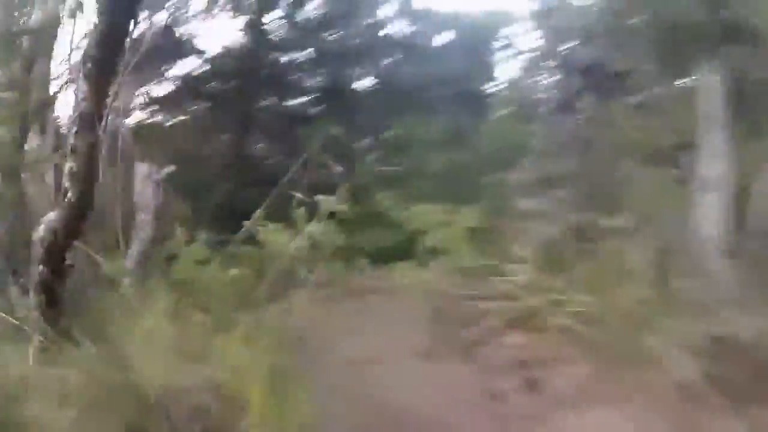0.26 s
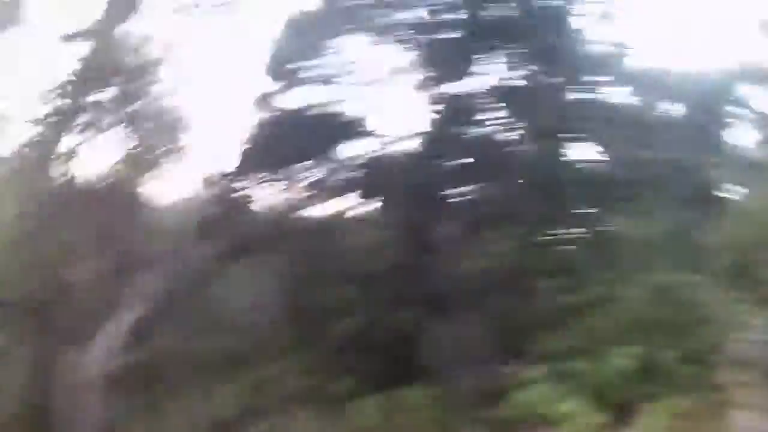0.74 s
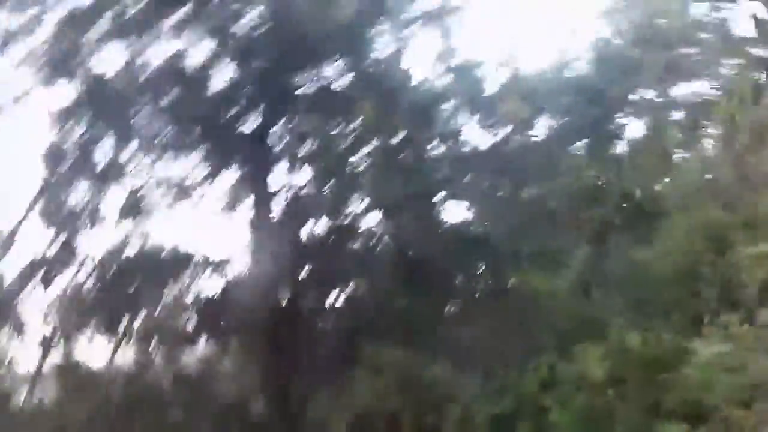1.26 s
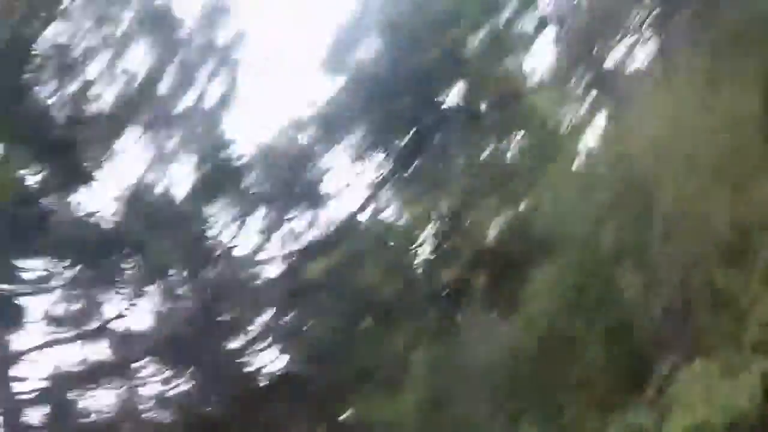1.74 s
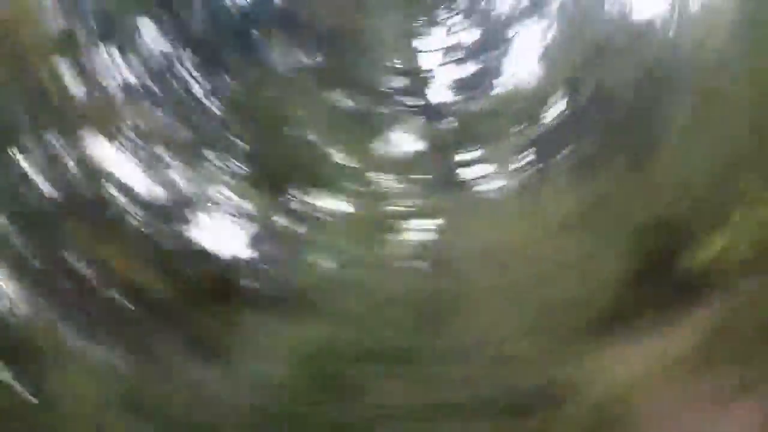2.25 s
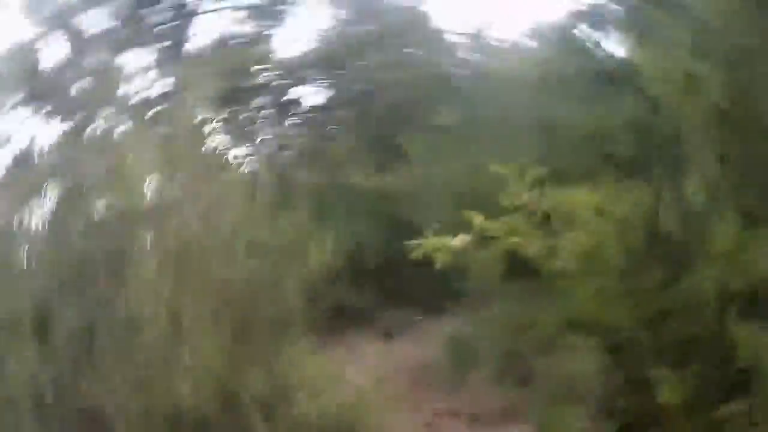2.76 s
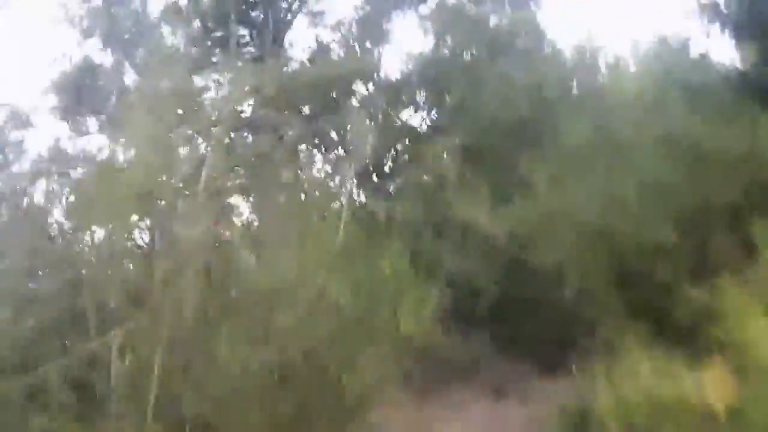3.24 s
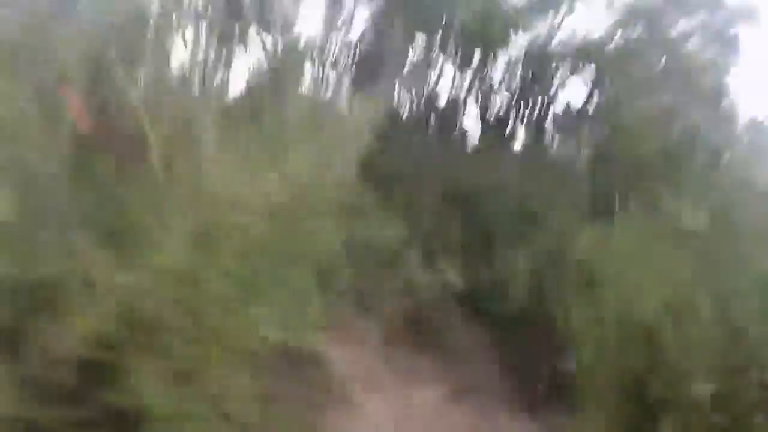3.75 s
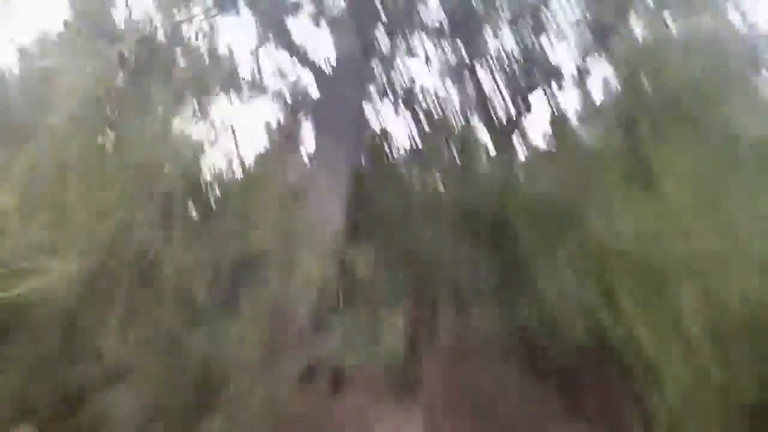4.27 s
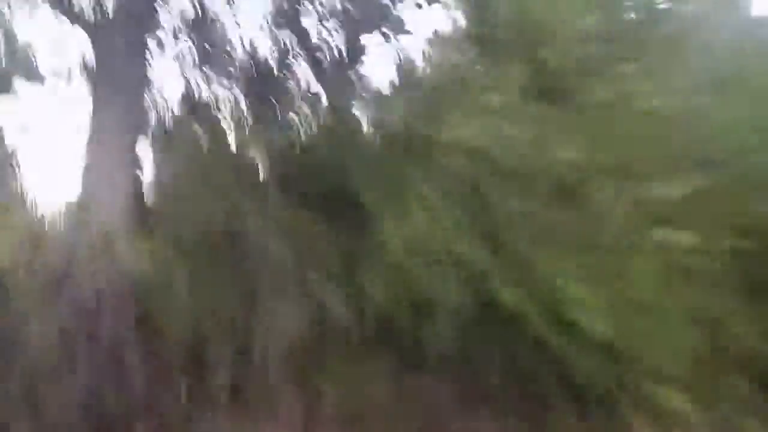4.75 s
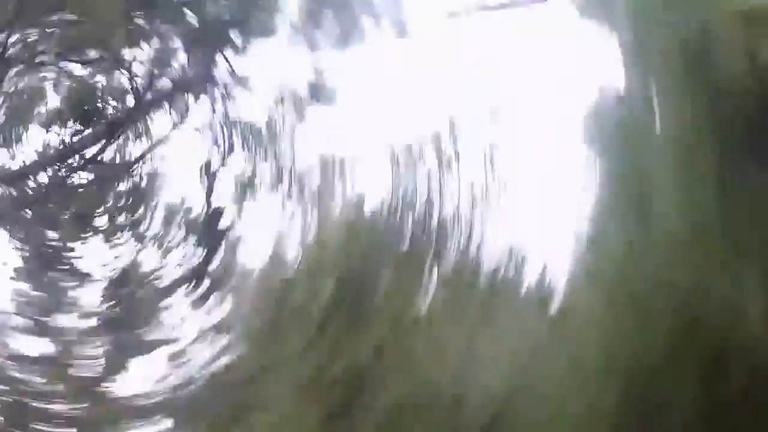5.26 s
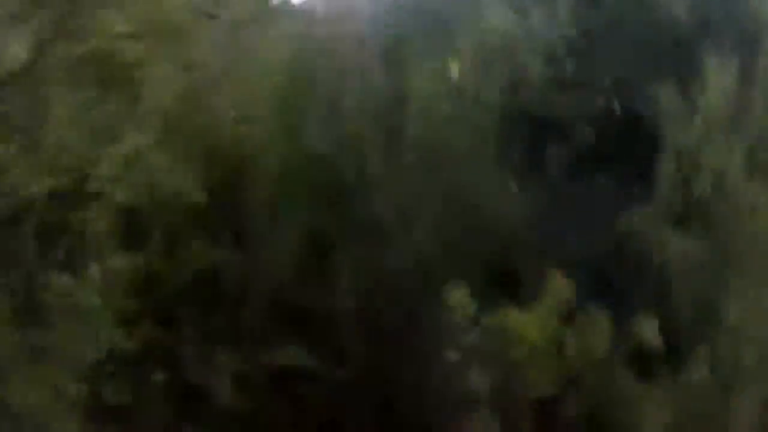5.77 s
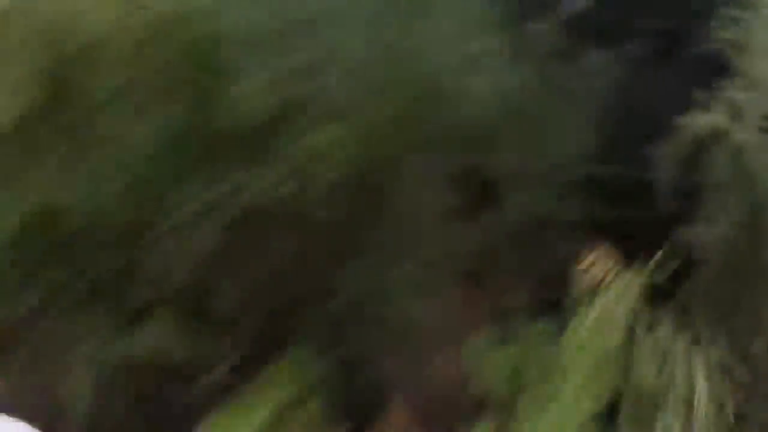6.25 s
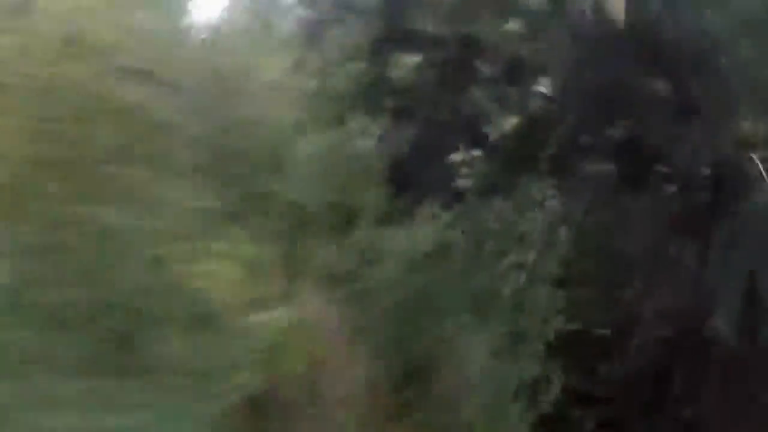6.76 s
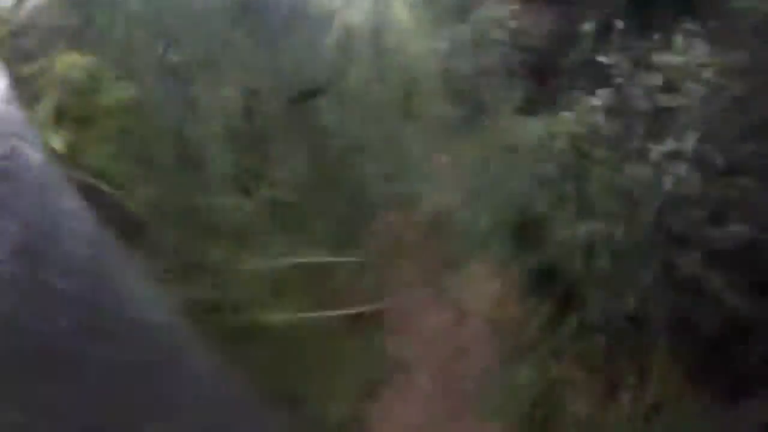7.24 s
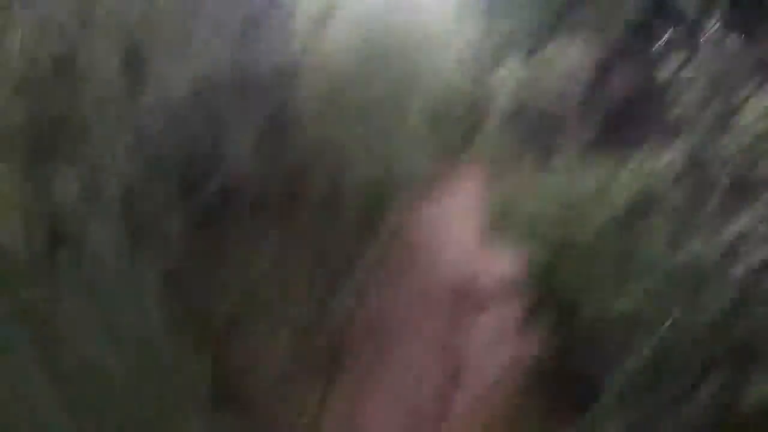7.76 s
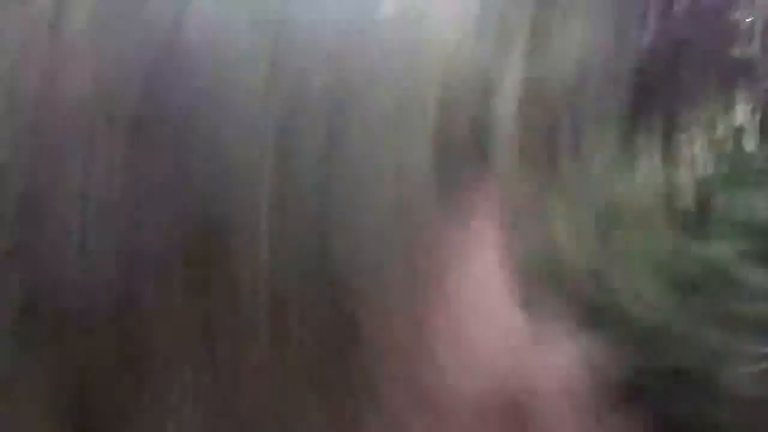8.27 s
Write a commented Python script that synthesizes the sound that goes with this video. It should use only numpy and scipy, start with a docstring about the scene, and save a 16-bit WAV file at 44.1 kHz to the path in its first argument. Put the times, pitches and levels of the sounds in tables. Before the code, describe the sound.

A runner hurries along a wooded dirt path, heard close from a small handheld camera in a plastic case. Shoes scrape, twigs crack and wind thumps unevenly on the microphone throughout. Fingers give the case one loud, hollow knock early, then a cluster of bumps and rubs later on. A twig snaps sharply just before the end. The treble has a slightly harsh, gritty edge.

```python
"""A runner hurries down a forest trail, holding a small camera in a plastic housing.
From the start air buffets the port, shoes scuff dirt and brush, twigs snap and grit ticks.
At 1.2 s the hardest knock of the fingers sets the housing's walls and enclosed air ringing.
Steps and wind carry on; knocks and rubs crowd in from 4.5 to 6.5 s, and a sharp snap comes at 8.1 s.
Throughout, the camera samples slowly and holds each sample, mirroring the sound into the treble."""
import sys
import numpy as np
from scipy import signal
from scipy.fft import rfft, irfft, next_fast_len
from scipy.io import wavfile
from scipy.ndimage import uniform_filter1d, map_coordinates

SR = 44100
rng = np.random.default_rng(int(sys.argv[2]) if len(sys.argv) > 2 else 0)


def output_pcm(signal):
    """Save a mono or channel-first signal as 16-bit PCM at the path in sys.argv[1].

    Samples are clipped to [-1, 1] before scaling.
    """
    pcm = np.clip(np.atleast_2d(signal).T, -1, 1) * 32767
    wavfile.write(sys.argv[1], SR, np.round(pcm).astype(np.int16))


N = 375291

# modes of the housing walls: pitch_hz, width_hz, gain_db
WALL_MODES = [(719, 106, 0), (914, 44, 0.5), (1134, 75, -4), (1832, 180, -4.5), (2317, 320, -1.5),
              (2413, 128, -6.5), (3000, 320, -25), (3457, 73, -6.5), (3643, 147, 3.5), (4874, 150, -16)]
# finger knocks: start_s, level_db, hollow_offset_db, walls_offset_db, hollow_pitch_hz, t60_s
KNOCKS = [(0.138, -40, 3, -16, 437, 0.028), (0.317, -44.5, 7, -26, 404, 0.036),
          (0.467, -40.5, 4.5, -18, 405, 0.027), (0.56, -47.5, 8, -13, 407, 0.089),
          (0.775, -33.5, 11, -6.5, 450, 0.043), (1.23, -11.5, -3, -12.5, 403.4, 0.065),
          (1.285, -26.5, 4, -16.5, 410, 0.058), (1.457, -43, 9.5, -3, 422, 0.056),
          (2.333, -49, -1, -16, 413, 0.031), (2.403, -44.5, 0.5, -9, 405, 0.071),
          (2.525, -59.5, 13, -24, 420, 0.035), (4.52, -34, 2.5, -27, 421, 0.036),
          (4.676, -22.5, -3, -16.5, 443, 0.029), (4.903, -35, -3.5, -23, 426, 0.029),
          (5.044, -42, 2, 1, 401, 0.15), (5.309, -23.5, -15.5, -14, 448, 0.023),
          (5.436, -39, 5, -21, 446, 0.031), (5.487, -57, 12, -33, 418, 0.042),
          (5.545, -35, 4, -27, 432, 0.028), (5.642, -44, 12, -21, 438, 0.14),
          (5.661, -24, 3.5, -11, 427.5, 0.053), (5.729, -28.5, 0, -2, 413, 0.054),
          (5.748, -40.5, 7.5, -15, 408, 0.026), (5.913, -27, -3, -25, 376, 0.022),
          (6.086, -32.5, -5, -9, 440, 0.033), (6.15, -28.5, -10, -8, 450, 0.046),
          (6.205, -39.5, 6, -12, 415, 0.065), (6.306, -31, -9, -17, 350, 0.028),
          (6.344, -31, -7, -26, 428, 0.043), (6.408, -22.5, -9.5, -7, 410, 0.066),
          (6.474, -40.5, 8.5, -4, 415, 0.056)]

def knocks():
    """Impulse response: a knock gives a dry tap and excites the walls and the air in the hollow."""
    hollow, taps, blows = np.zeros((3, N))
    t = np.arange(SR // 8) / SR
    swell = 1 - np.exp(-(t / 0.003) ** 2)
    for start, db, hollow_db, walls_db, hz, t60 in KNOCKS:
        ring = amp(db + hollow_db - 2 - 60 * (t / t60) ** 2.32)  # holds, then the grip damps it fast
        add(hollow, start, ring * swell * np.sin(2 * np.pi * hz * t))
        chatter = rng.standard_normal(len(t))
        chatter[0] = amp(15.5)  # the first contact stands out
        add(taps, start, amp(db + 5.5 - 60 * t / 0.014) * chatter)
        crack = amp(-60 * t / 0.0062)
        rattle = amp(-23.5 - 60 * (t / t60) ** 2)
        add(blows, start, amp(db + walls_db + 20) * (crack + rattle) * chatter)
    contact = modes([(974, 390, 0.4), (2037, 420, 1.4), (215, 275, 4.5)])
    return hollow + filtered(taps, contact) + filtered(blows, modes(WALL_MODES))

# strokes of the hand on the housing: start_s, length_s, level_db, swell_db, hollow_offset_db
RUBS = [(.14, 0.087, -61.5, -12, -2), (.25, .19, -70, 7, 10.5), (.455, 0.046, -57, 3, -1.5),
        (.56, 0.14, -65.5, -9, -2), (.7, 0.042, -66.5, 10, 10.5), (.88, 0.025, -64, 7, 2),
        (.98, 0.076, -58.5, 0, 6), (1.42, 0.049, -45, 4, -1.5), (1.485, .065, -48, -7, 0.5),
        (2.33, .1, -60, -5.5, 0.5), (5.04, 0.068, -48.5, -2, -3), (5.12, 0.059, -67, 1, 13),
        (5.44, 0.18, -62, 13, 0), (5.64, 0.099, -44, 0, 2), (5.915, 0.043, -49, -4.5, 3.5),
        (5.985, 0.067, -51.5, 2, -7), (6.088, 0.13, -46, 1, -3), (6.3, .04, -52.5, 0, 3.5),
        (6.345, 0.077, -37.5, 8.5, -2), (6.44, 0.084, -48, -9, 0), (6.51, 0.067, -51.5, 4, -5)]
RUB_EDGES = dict(rise_s=0.0022, fall_s=0.014, length_share=0.027)

def rubs(hollow_hz=416.8, hollow_width_hz=67):
    """Forced vibration: rough friction drives the wall modes and the cavity resonance."""
    walls = unit(filtered(gritty(70, spread_db=3), modes(WALL_MODES)))
    hollow = unit(filtered(gritty(40, spread_db=3), modes([(hollow_hz, hollow_width_hz, 0)])))
    wall_gain, hollow_gain = strokes(RUBS, **RUB_EDGES)
    return wall_gain * walls + hollow_gain * hollow

# spectra of a scuff and of its dull part: frequency_hz, density_db
DIRT_SPECTRUM = [(880, -38), (1500, -3.5), (1660, -4.5), (1810, 8.5), (1960, 4.5), (2390, 5.5),
                 (2740, -5.5), (3000, 1), (4200, -14), (5460, -50), (9240, -120)]
DULL_SPECTRUM = [(260, 8), (450, -9.5), (624, -6), (992, -4), (1210, 1), (1500, -4), (1950, -34),
                 (3300, -120)]
# brush and litter stirring between scuffs: time_s, level_db
BRUSH = [(0.0, -63.5), (0.33, -67), (0.8, -59), (1.04, -71), (1.26, -65), (1.4, -59), (1.56, -69.5),
         (2.72, -64.5), (2.94, -63.5), (5.57, -66.5), (6.35, -61), (6.71, -57), (7.42, -62), (8.51, -60)]
# drags of a shoe or leg: start_s, length_s, level_db, swell_db, dull_offset_db, hiss_offset_db
SCUFFS = [(.095, 0.14, -64.5, -8, -5, -18), (.45, 0.19, -59, 1.5, -4.5, -6.5),
          (.605, 0.02, -44.5, 2, -5.5, -29), (.662, 0.031, -52, -3, -8, -16),
          (.705, 0.023, -45.5, 3, -8, -36), (.765, 0.037, -54.5, -11, -4, -25),
          (.885, 0.07, -54.5, 11.5, -11, -15.5), (.97, 0.075, -61, -2, 0.5, -14),
          (1.31, 0.068, -64.5, 15, -17, -21), (1.425, 0.046, -55.5, 2, -1, -12),
          (1.485, 0.081, -60.5, -20, -4, -12), (1.76, 0.11, -69.5, -5, -14, -18),
          (2.17, 0.14, -66.5, -2, -11, -10), (2.32, 0.094, -64.5, 11, -8, -23),
          (2.61, 0.071, -65.5, -4, -12, -4), (2.82, 0.31, -58.5, 3.5, -9, -12),
          (3.2, 0.14, -63.5, 11, -13.5, -11), (3.42, 0.23, -63.5, 6, -3, -30),
          (3.72, 0.1, -60, 15, -2, -16), (3.91, 0.27, -60, 0, -11.5, -15), (4.2, 0.076, -63, 9, -3, -8),
          (4.3, 0.27, -68, -12, -4, -9.5), (4.52, 0.087, -59, -6, -5, -12), (4.75, 0.11, -60, 3, -5, -14),
          (4.95, 0.073, -67, -2, -1, -3), (5.035, 0.11, -62.5, -9, -1, -20),
          (5.16, 0.17, -60.5, 0, -3, -17), (5.44, 0.17, -62.5, 10, -1.5, -22),
          (5.635, 0.15, -52, -4, -6, -20), (5.78, .09, -60, 9, -1, -10), (5.912, 0.059, -59, -3, -3.5, -14),
          (5.985, 0.081, -58.5, 5, -1, -16), (6.085, 0.09, -55, 21, -15, -14),
          (6.3, 0.025, -53.5, 4, 3, -22), (6.34, 0.16, -45.5, -6.5, -2.5, -22),
          (6.53, 0.29, -61.5, -8, -1.5, -19), (6.94, 0.059, -61, -9, 1.5, -10),
          (7.01, 0.12, -58.5, -10, 1, -14), (7.2, 0.1, -71, -3, -1, -9), (7.5, 0.052, -66.5, 9, -1, -17),
          (7.6, 0.074, -62, 5, -10, -21), (7.925, 0.062, -50.5, 2, -5.5, -14),
          (8.1, 0.15, -60, -9, -6, -11), (8.27, .15, -61, -3, -8, -20), (8.46, .05, -76, -3, -16, -20)]

def ground_gains():
    """Incoherent sources add in power: drags plus brush, as gains of scrape, dull part and hiss."""
    brush = amp(curves(BRUSH)[0] + np.array([-5, -9.5, -13])[:, None])
    drags = strokes(SCUFFS, rise_s=0.0041, fall_s=0.0069, length_share=0.083)
    return np.hypot(drags, brush)

def scuffs(scrape_gain, dull_gain, hiss_gain):
    """Granular friction: dirt gives way in clumps that modulate three bands of noise together."""
    clumps = amp(1.07 * wobble(25))
    grains = patchy(gritty(200, spread_db=2.5), patch_db=1.4)
    scrape = unit(clumps * filtered(grains, colour(DIRT_SPECTRUM)))
    dull = unit(clumps * filtered(gritty(60, spread_db=4), colour(DULL_SPECTRUM)))
    hiss_band = colour([(3000, -14), (4300, -3.5), (5300, 0), (6000, -10.5)])
    hiss = unit(clumps * filtered(gritty(170, spread_db=2), hiss_band))
    return scrape_gain * scrape + dull_gain * dull + hiss_gain * hiss

# twigs and stones underfoot: start_s, level_db, pitch_hz, t60_s
SNAPS = [(0.199, -38, 2960, 0.034), (0.611, -38.5, 1830, 0.033), (0.673, -38.5, 2540, 0.084),
         (0.713, -39, 2550, 0.039), (0.741, -38.5, 1810, 0.031), (0.809, -30.5, 895, 0.041),
         (0.94, -37.5, 1857, 0.053), (1.372, -38, 1180, 0.027), (1.426, -35, 2530, 0.08),
         (2.201, -40, 1770, 0.015), (3.096, -38, 2410, 0.04), (3.713, -41, 1900, 0.016),
         (4.112, -37, 2460, 0.033), (4.248, -45.5, 3770, 0.048), (4.422, -44.5, 1850, 0.016),
         (4.625, -37, 1900, 0.033), (4.636, -36.5, 1230, 0.026), (4.827, -38.5, 2350, 0.034),
         (4.857, -38, 930, 0.031), (5.174, -51, 1160, 0.03), (5.311, -26.5, 1600, 0.021),
         (7.114, -38, 1220, 0.034), (7.299, -50, 2250, 0.039), (7.626, -42, 1750, 0.013),
         (7.94, -41, 1750, 0.019), (8.082, -27.5, 1593, 0.046), (8.225, -40, 1480, 0.032)]

def snaps():
    """Brittle fracture: the broken piece rings briefly inside a wider crackle."""
    out = np.zeros(N)
    t = np.arange(SR // 16) / SR
    for start, db, hz, t60 in SNAPS:
        band = signal.butter(2, [0.3 * hz, min(3.17 * hz, 5500)], "band", fs=SR)
        crackle = signal.lfilter(*band, rng.standard_normal(len(t)))
        ring = np.sin(2 * np.pi * hz * t)
        add(out, start, amp(db + 1.5 - 60 * t / t60) * (0.49 * ring + 0.47 * crackle))
    return out

# bright ticks of grit: start_s, level_db, low_offset_db
TICKS = [(0.0733, -39, 5.5), (0.1988, -61, -1), (0.2928, -40.5, 2.5), (0.3084, -48, -5), (0.512, -37.5, 4),
         (0.572, -43, 3), (0.8974, -41, 6), (0.9404, -68, -5), (1.0221, -61, -1), (1.291, -54, 5),
         (1.3623, -45, 10.5), (1.394, -56, 21), (1.45, -34, 11.5), (1.6353, -45.5, 2), (1.733, -43.5, 3.5),
         (1.8677, -46.5, 4.5), (2.2222, -37, 2.5), (2.5475, -48, 3), (2.642, -43, 4.5), (2.6584, -44, 5),
         (3.3237, -43, 6), (3.5012, -41, 5), (4.1777, -42.5, 4), (4.375, -35.5, 2.5), (4.4486, -41.5, 0),
         (4.582, -37, 3), (4.6345, -50, 1), (4.7753, -39.5, 1), (4.8328, -56.5, 22), (4.9422, -46, 1),
         (4.9675, -38, 9), (5.185, -43, 5), (5.5154, -48, -1), (5.677, -36, 4), (5.8558, -32, 3.5),
         (5.9184, -42, 4), (6.542, -37, 9.5), (6.693, -45, 1), (6.796, -34, 4), (6.958, -47, 5),
         (7.429, -48.5, 7), (7.7372, -46, 6), (7.8466, -44.5, 8), (7.9162, -38.5, -4), (7.9396, -34.5, 6),
         (8.418, -33, 1.5)]

def grit(hiss_gain, t60_s=0.014, grains_per_s=40):
    """Brief impacts are broadband: ticks excite two resonances, small random grains the upper one."""
    high, low = np.zeros((2, N))
    t = np.arange(SR // 16) / SR
    for start, db, low_db in TICKS:
        burst = amp(db - 60 * t / t60_s) * rng.standard_normal(len(t))
        add(high, start, burst)
        add(low, start, amp(low_db) * burst)
    hits = rng.random(N) < grains_per_s / SR
    sizes = amp(6.4 * rng.standard_exponential(N).clip(0, 3))
    high += amp(18) * hiss_gain * hits * sizes * rng.choice([-1, 1], N)
    return filtered(high, modes([(5590, 630, 9.1)])) + filtered(low, modes([(3540, 800, 2.1)]))

# spectrum of the buffeting: frequency_hz, density_db
BUFFET_SPECTRUM = [(8.8, -25), (15, -6), (36, 2.5), (130, -20.5), (170, -60), (290, -120)]
# air on the port: time_s, buffet_db, flutter_db
WIND = [(0.0, -50, -67), (0.04, -62, -66), (0.16, -50.5, -65), (0.4, -57.5, -65), (0.57, -48, -64),
        (1.04, -49, -56.5), (1.4, -50.5, -59.5), (1.63, -54.5, -67.5), (2.61, -46, -62.5),
        (2.89, -45.5, -66.5), (3.27, -55.5, -74), (3.55, -47.5, -61), (4.19, -51, -64.5), (4.24, -39, -66),
        (4.38, -50.5, -60.5), (5.52, -44.5, -58), (5.55, -40, -58.5), (6.09, -46.5, -51), (6.35, -44, -58),
        (6.47, -40, -62), (6.52, -41.5, -66), (7.02, -45.5, -62.5), (7.04, -51, -75), (7.44, -45.5, -65.5),
        (7.8, -55.5, -70), (7.91, -40.5, -55.5), (8.15, -49, -67), (8.2, -40.5, -61), (8.46, -50, -62),
        (8.51, -65, -70)]

def wind():
    """Turbulence: large eddies push the port in lumps, and smaller ones flutter faster."""
    buffet_db, flutter_db = curves(WIND)
    eddies = wobble(16)
    buffet = unit(filtered(amp(2.5 * eddies) * gritty(6, spread_db=2.5), colour(BUFFET_SPECTRUM)))
    flutter_band = colour([(60, -30), (90, -10), (120, -7), (250, -11), (500, -16.5), (1100, -55)])
    flutter = unit(filtered(amp(3 * eddies) * gritty(40, spread_db=4), flutter_band))
    shake = amp(-4.5) * strokes(RUBS, **RUB_EDGES)[0]  # more flutter while the hand rubs
    return amp(buffet_db) * buffet + (amp(flutter_db) + shake) * flutter

# dull pushes of the arm on the port: start_s, level_db, pitch_hz
THUMPS = [(0.134, -44, 140), (0.465, -41.5, 223), (0.771, -27, 225), (0.971, -40, 62.5), (1.112, -42.5, 64),
          (1.363, -36, 66), (2.404, -49, 61.9), (3.134, -48, 128), (3.475, -45.5, 86), (3.559, -39.5, 85),
          (3.79, -60, 62.3), (4.021, -44, 61), (4.516, -37.5, 133), (4.674, -39.5, 69), (4.864, -40.5, 90),
          (5.17, -50, 59.6), (5.374, -39.5, 62.6), (5.535, -41, 62.6), (5.658, -25.5, 230),
          (5.913, -36, 318), (6.022, -43, 135), (6.359, -39, 127), (6.4, -28.5, 154), (6.457, -32, 99),
          (6.896, -31, 154), (7.266, -49, 94), (7.364, -42, 65), (7.955, -37.5, 127), (8, -45, 80),
          (8.19, -46, 60.6), (8.244, -52, 61.9)]

def thumps(puffs_per_s=20, low_hz=50.2, high_hz=124.7):
    """Pressure pulses: the arm and small random puffs of air each give one push and its return."""
    buffet_db = curves(WIND)[0]
    puffs = []
    for when, size, pitch in rng.random((round(puffs_per_s * N / SR), 3)):
        db = buffet_db[int(when * N)] - 9 - 4.5 * np.log(1 - 0.9 * size)
        puffs.append((when * N / SR, db, low_hz * (high_hz / low_hz) ** pitch))
    out = np.zeros(N)
    t = np.arange(SR // 20) / SR
    for start, db, hz in THUMPS + puffs:
        cycles = hz * t - 0.7  # zero at the middle of the pulse
        add(out, start, amp(db + 8.5) * np.sin(2 * np.pi * cycles) * np.exp(-(cycles / 0.24) ** 2))
    return out

# spectrum of the forest background: frequency_hz, density_db
FOREST_SPECTRUM = [(120, 10.5), (200, 6), (621, 0.5), (1630, -5.5), (1820, -16), (2350, -24.5), (2750, -23),
                   (3650, -1.5), (5420, -40.5), (5900, -36), (7670, -57), (13000, -120)]

def forest(level_db=-70):
    """Ambient noise floor: a faint coloured hush whose level wavers."""
    return amp(level_db) * unit(filtered(gritty(14, spread_db=1.5), colour(FOREST_SPECTRUM)))

def amp(db):
    """Decibels as an amplitude ratio."""
    return 10 ** (np.asarray(db) / 20)

def unit(x):
    """Normalisation to an RMS of one."""
    return x / np.sqrt(np.mean(x ** 2) + 1e-20)

def add(track, start_s, sound):
    """Superposition of a short sound on a track."""
    part = track[round(start_s * SR):][:len(sound)]
    part += sound[:len(part)]

def curves(rows):
    """Linear interpolation of each level column over time; silent outside the rows."""
    times, *columns = np.transpose(rows)
    return [np.interp(np.arange(N) / SR, times, db, -120, -120) for db in columns]

def strokes(rows, rise_s, fall_s, length_share):
    """Envelopes summed in power, one per part; an edge covers 20 dB in its time plus a share of length."""
    power = np.zeros((len(rows[0]) - 3, N))
    for start, length, db, swell_db, *offsets_db in rows:
        rise, fall = np.array([rise_s, fall_s]) + length_share * length
        corners = [start - 4 * rise, start, start + length, start + length + 4 * fall]
        n = np.arange(max(round(corners[0] * SR), 0), min(round(corners[-1] * SR), N))
        shape_db = np.interp(n / SR, corners, [-80, -swell_db / 2, swell_db / 2, -80])
        power[:, n] += amp(db + shape_db + np.array([0, *offsets_db])[:, None]) ** 2
    return np.sqrt(power)

def wobble(knots_per_s):
    """Spline interpolation of random knots: a smooth random curve."""
    return map_coordinates(rng.standard_normal(N // 100), [np.arange(N) * knots_per_s / SR])

def gritty(grains_per_s, spread_db):
    """Random amplitude modulation: noise whose strength jumps in grains."""
    return unit(amp(spread_db * wobble(grains_per_s)) * rng.standard_normal(N))

def patchy(x, patch_db):
    """Spectral modulation: leaves and clods differ, so the colour wanders in patches."""
    spectra = signal.stft(x, nperseg=512)[2]
    across_pitch = uniform_filter1d(rng.standard_normal(spectra.shape), size=5, axis=0)
    patches = uniform_filter1d(across_pitch, size=10, axis=1)
    return signal.istft(spectra * amp(patch_db * unit(patches)), nperseg=512)[1][:N]

def filtered(x, response):
    """Linear filtering: the spectrum times a frequency response."""
    size = next_fast_len(N + SR // 2)
    return irfft(rfft(x, size) * response(np.fft.rfftfreq(size, 1 / SR)), size)[:N]

def colour(points):
    """Magnitude response through (frequency_hz, gain_db) points on a log axis."""
    points_hz, db = np.transpose(points)
    return lambda hz: amp(np.interp(np.log(hz + 1), np.log(points_hz + 1), db, -120, -120))

def modes(table):
    """Modal sum: each resonance acts twice, so the valleys between stay dark."""
    return lambda f: sum(amp(db) * (1j * f * width / (hz * hz - f * f + 1j * f * width)) ** 2
                         for hz, width, db in table)

def scene():
    """Superposition: air, ground, housing and forest add in one channel."""
    air = wind() + thumps()
    scrape_gain, dull_gain, hiss_gain = ground_gains()
    ground = scuffs(scrape_gain, dull_gain, hiss_gain) + snaps() + grit(hiss_gain)
    housing = rubs() + knocks()
    return (housing + ground + air + forest())[None]

CAMERA_RATE_HZ, ANTI_ALIAS_HZ, TOP_HZ = 12000, 5750, 15500

def record(dry):
    """Sample and hold: sampling repeats the spectrum around its rate; holding shades it by a sinc."""
    size = SR * (N // SR + 1)
    hz = np.fft.rfftfreq(size, 1 / SR)
    slow_size = size * CAMERA_RATE_HZ // SR
    lowpass = 1 / np.sqrt(1 + (hz / ANTI_ALIAS_HZ) ** 30)
    samples = irfft((rfft(dry[0], size) * lowpass)[:slow_size // 2 + 1], slow_size)
    images = np.fft.fft(samples)[np.arange(len(hz)) % slow_size]
    held = images * np.sinc(hz / CAMERA_RATE_HZ)
    return irfft(held * (hz < TOP_HZ), size)[None, :N]

dry = scene()
out = record(dry)
output_pcm(out)
```